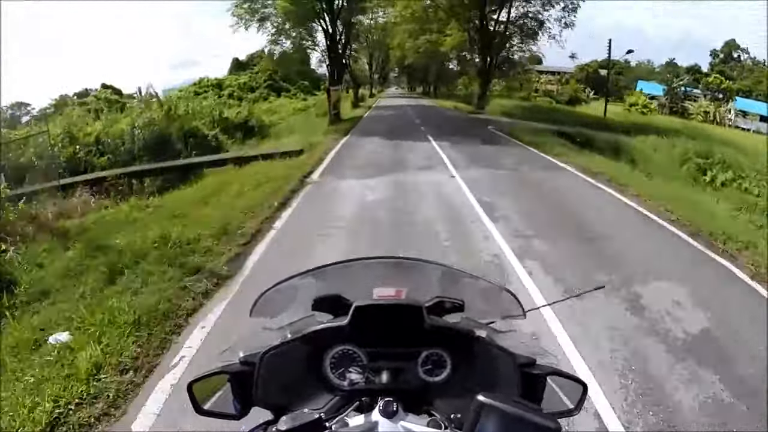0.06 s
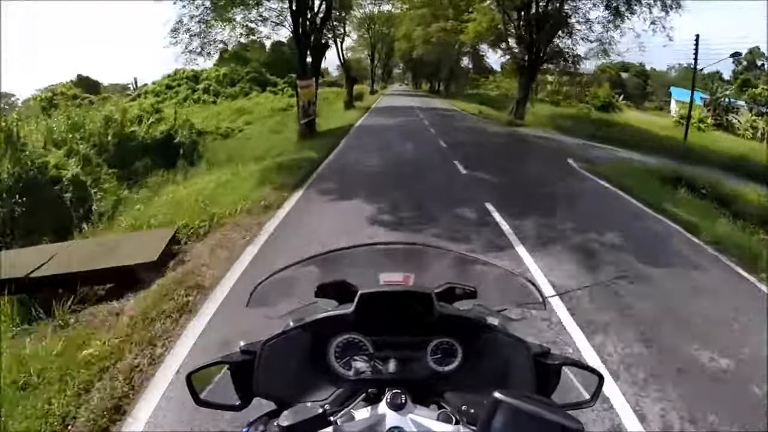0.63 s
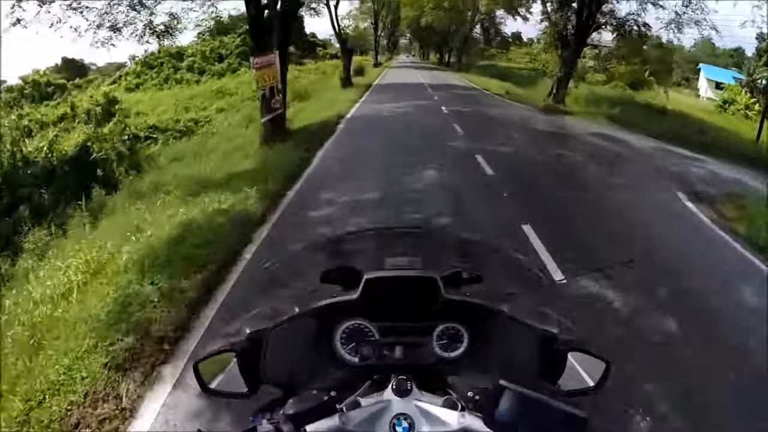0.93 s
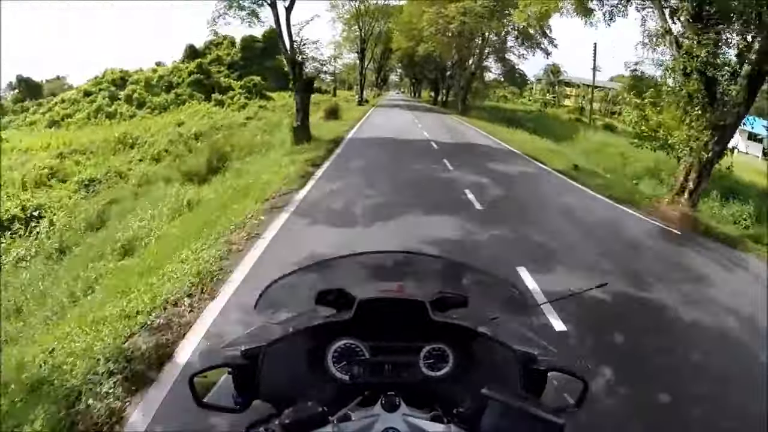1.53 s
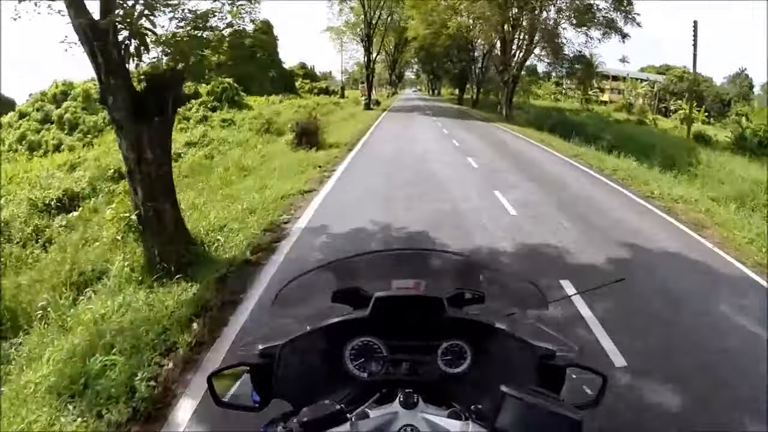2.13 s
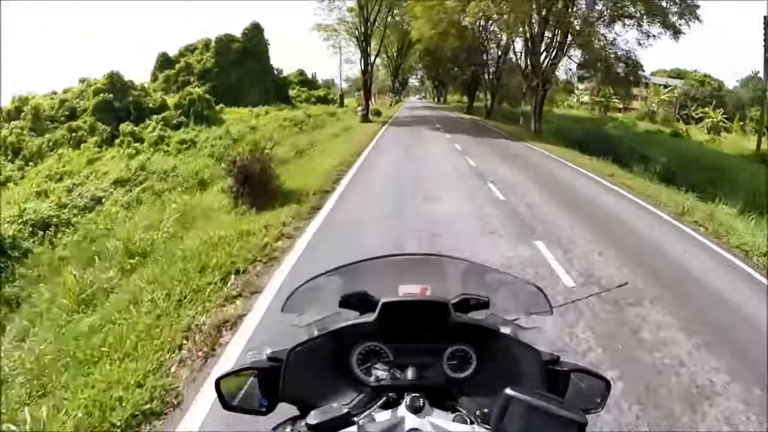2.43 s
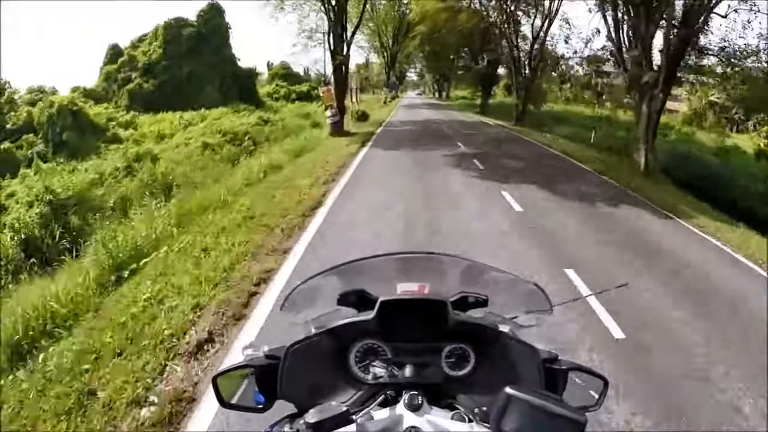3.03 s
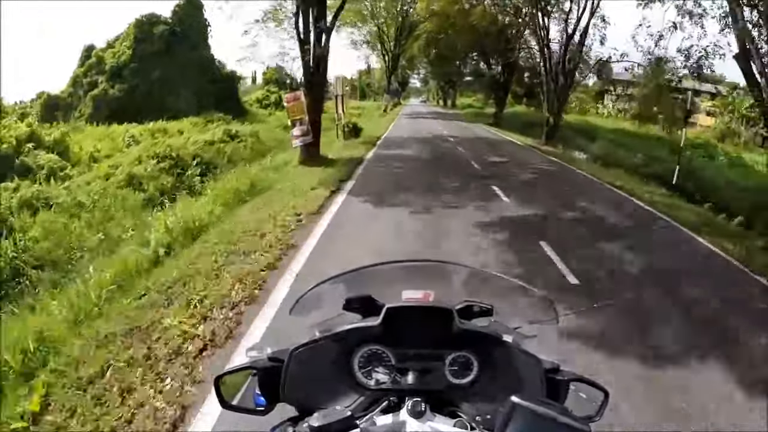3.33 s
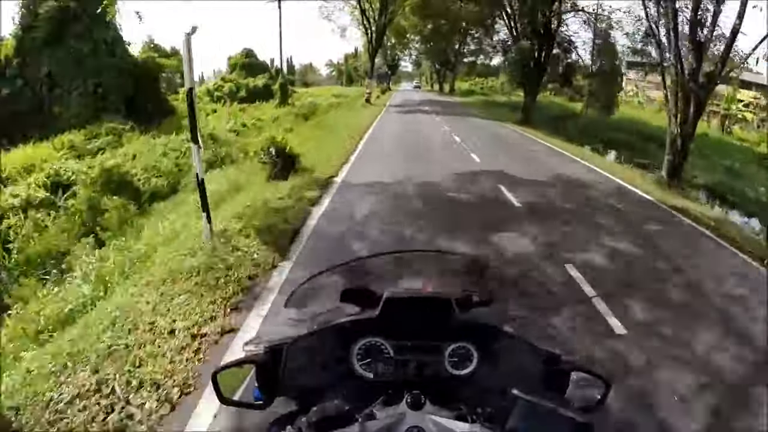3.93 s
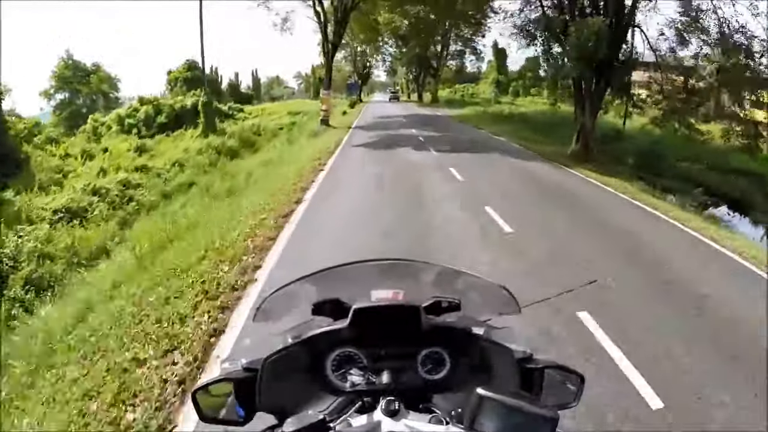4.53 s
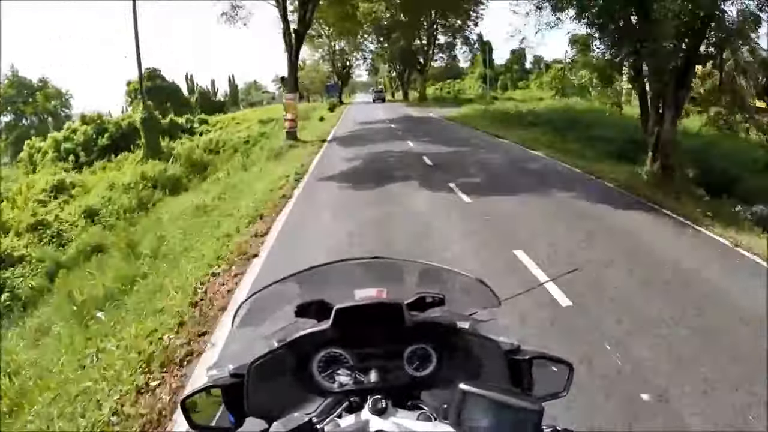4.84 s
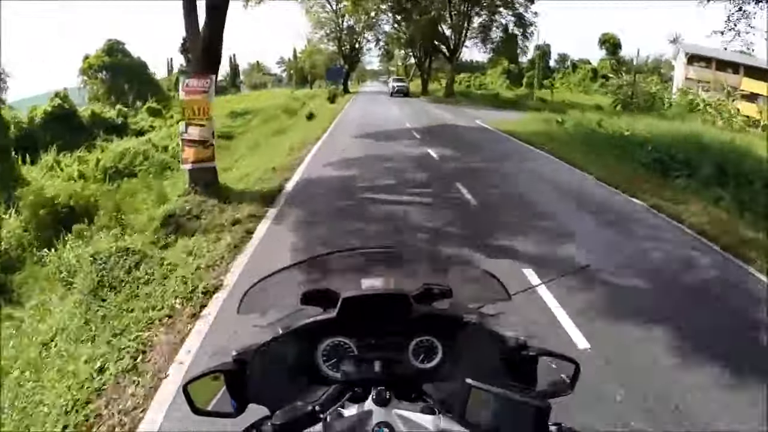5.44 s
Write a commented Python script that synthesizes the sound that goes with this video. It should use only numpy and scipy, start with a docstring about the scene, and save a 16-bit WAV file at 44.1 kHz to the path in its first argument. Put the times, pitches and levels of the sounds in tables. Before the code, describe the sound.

Close, heavy wind noise fills a helmet microphone on a moving motorcycle from start to finish. The air churns in a low rumble, topped by a flickering hiss, and keeps striking the microphone in uneven thumps. The hardest slaps come about a third and two thirds of the way through, each briefly squashing the rush. Otherwise the strength holds fairly even, with small swells and dips.

```python
"""Helmet wind on a country road

Wind on the helmet microphone of a cruising motorcycle. Eddies shed by the windscreen buffet the port
in thumps, and finer turbulence rumbles, roars and hisses round the shell. Now and then the low end
dips or a brief puff swells in the noise. The hardest slaps of air drive the camera's limiter, so that
the whole rush ducks and swells back."""
import sys
import numpy as np
from scipy import signal
from scipy.fft import rfft, irfft, next_fast_len
from scipy.io import wavfile
from scipy.ndimage import uniform_filter1d, minimum_filter1d

SR = 44100
rng = np.random.default_rng(int(sys.argv[2]) if len(sys.argv) > 2 else 0)


def store_wav(level_fs):
    """Save 16-bit WAV to argv[1]."""
    pcm = np.round(np.clip(np.atleast_2d(level_fs), -1, 1) * 32767)
    wavfile.write(sys.argv[1], SR, pcm.T.astype(np.int16))


N = 250047
TIME = np.arange(N) / SR


def from_db(db):
    """Decibels to gain."""
    return 10 ** (np.asarray(db) / 20)


def rms_one(x):
    """Scale to unit rms."""
    return x / np.sqrt(np.mean(x ** 2) + 1e-20)


def automation(points):
    """Straight ramps through (seconds, value) points."""
    return np.interp(TIME, *np.transpose(points))


def swell(centre_s, half_s):
    """A bell-shaped fade up to 1 and back."""
    return np.exp(-((TIME - centre_s) / half_s) ** 2 / 2)


def shaped_noise(gain_at):
    """Noise of unit rms, coloured by a gain as a function of frequency."""
    size = next_fast_len(N)
    hz = np.maximum(np.arange(size // 2 + 1) * SR / size, 1)
    white = rfft(rng.standard_normal(size))
    return rms_one(irfft(white * gain_at(hz), size)[:N])


def turbulence(colour):
    """Churning air: noise through an EQ curve of (Hz, dB) points, falling away beyond its ends."""
    points_hz, db = np.transpose(colour)

    def gain_at(hz):
        skirts = np.minimum(1, np.minimum(hz / points_hz[0], points_hz[-1] / hz)) ** 2
        return skirts * from_db(np.interp(np.log(hz), np.log(points_hz), db))
    return shaped_noise(gain_at)


def flutter(rate_hz, slowest_hz=9):
    """A random wobble of unit rms, mostly between the two rates."""
    return shaped_noise(lambda hz: hz / np.hypot(hz, slowest_hz) / (1 + (hz / rate_hz) ** 2))


def steadied(x, span_s, share):
    """Even out slow swells: a steady stream sheds eddies of similar strength."""
    size = int(span_s * SR)
    power = uniform_filter1d(uniform_filter1d(x ** 2, size), size)
    return rms_one(x / (power + 1e-9) ** (share / 2))


def buffet():
    """Big eddies off the windscreen rock the diaphragm."""
    # Sub-bass weight. Each row: frequency in Hz, relative level in dB.
    colour = [(14, -7), (25, -0.8), (35, -1.5), (46, 1), (60, -1), (78, 0.5), (98, -2), (125, -4.5),
              (150, -13.5), (220, -26)]
    return steadied(turbulence(colour), span_s=0.11, share=0.61)


def rumble(flurry, surge):
    """Mid-sized eddies roll past in flurries."""
    # Low body of the wind. Each row: frequency in Hz, relative level in dB.
    colour = [(90, -12), (150, 2.5), (200, 0.5), (260, -3), (330, -7), (400, -10.5), (500, -18.5),
              (800, -36)]
    body = steadied(turbulence(colour), span_s=0.06, share=0.85)
    return body * from_db(1.64 * flurry + 0.22 * surge)


def roar(flurry, surge):
    """Small eddies rush round the shell, with a flutter of their own."""
    # Midrange of the wind. Each row: frequency in Hz, relative level in dB.
    colour = [(250, -16.5), (400, 0.5), (480, 1), (630, -2), (800, -5.5), (1000, -10.5), (1300, -15.5),
              (2000, -24.5), (4000, -33)]
    rush = steadied(turbulence(colour), span_s=0.17, share=0.57)
    return rush * from_db(0.76 * flurry + 0.23 * surge + flutter(rate_hz=32))


def hiss(flurry, surge, crossover_hz=2900):
    """The finest turbulence flickers fast, while its treble slowly swells and eases."""
    # Airy top of the wind. Each row: frequency in Hz, relative level in dB.
    colour = [(600, -16), (1000, 2.5), (1500, 2.5), (2000, 0), (2700, -3), (3500, -7), (4200, -10.5),
              (5400, -11.5), (7000, -16.5), (9000, -21.5), (11000, -26), (13500, -35.5), (15500, -44)]
    # Treble ride above the crossover. Each row: time in seconds, gain in dB.
    treble = [(0, -1.5), (0.33, -1), (0.55, -1.7), (0.85, -1.5), (1.0, -1), (1.25, -0.5), (1.6, 0.2),
              (2.15, -0.7), (2.5, 0), (2.95, -0.9), (3.35, -1), (3.8, 0.2), (4.42, -1), (4.68, -1.5),
              (4.9, -2), (5.25, -0.6), (5.45, -1), (5.67, -4.5)]
    air = turbulence(colour)
    low = signal.sosfiltfilt(signal.butter(2, crossover_hz, fs=SR, output="sos"), air)
    air = low + from_db(automation(treble)) * (air - low)
    return air * from_db(0.78 * flurry + 0.24 * surge + 0.88 * flutter(rate_hz=260))


def wind(displaced):
    """Four sizes of turbulence ride the airflow; brief dips and slap cores duck the lowest two."""
    # Airflow over the helmet. Each row: time in seconds, strength in dB about the usual.
    flow = [(0, -0.5), (0.32, 0.8), (0.45, 0.2), (0.88, 0), (1.0, 1.5), (1.28, 2), (1.42, 0.6), (1.8, 0),
            (2.1, -1.3), (2.22, -1.8), (2.42, -0.5), (2.66, -0.3), (2.8, 0.5), (2.95, -1.2), (3.2, 1.9),
            (3.34, 0), (3.48, 1.6), (3.7, 0), (3.88, -0.7), (4.12, -0.3), (4.32, 0.5), (4.5, 0.7),
            (4.56, -1), (4.93, -0.5), (5.15, -0.1), (5.67, 1.6)]
    # Brief irregular dips in the low buffeting and rumble.
    # Each row: centre and half length in seconds, depth in the buffet in dB.
    dips = [(0.27, .03, 3), (0.62, 0.024, 4), (0.918, 0.0094, 2.5), (1.98, 0.039, 3), (2.367, 0.015, 6),
            (2.99, 0.018, 6), (3.49, .025, 4), (4.002, 0.012, 6), (4.773, 0.029, 3.5), (4.933, 0.013, 4),
            (5.26, 0.026, 4)]
    flow_db = automation(flow)
    dip_db = sum(depth_db * swell(centre_s, half_s) for centre_s, half_s, depth_db in dips)
    thinning_db = 0.36 * (TIME - TIME.mean())   # the rumble thins as the ride goes on
    buffet_gain = from_db(-14 + 0.48 * flow_db - dip_db) * (1 - displaced)
    rumble_gain = from_db(-20.5 + flow_db - thinning_db - 0.28 * dip_db) * (1 - 0.49 * displaced)
    eddies = buffet()
    # the finer layers flutter together and are strongest where the pressure swings furthest
    flurry = flutter(rate_hz=44)
    surge = np.abs(eddies) - np.mean(np.abs(eddies))
    return (buffet_gain * eddies
            + rumble_gain * rumble(flurry, surge)
            + from_db(-32 + flow_db) * roar(flurry, surge)
            + from_db(-38.5 + flow_db) * hiss(flurry, surge))


def puffs():
    """Brief, irregular puffs in the wind noise: each is one band of noise swelling and fading."""
    # Puffs and swells. Each row: peak time and half length in seconds,
    # band centre and width in Hz, level in dB.
    bursts = [(0.234, .015, 5500, 4000, -50), (0.33, .022, 4200, 3000, -45), (0.545, 0.02, 375, 170, -23.5),
              (0.663, 0.0071, 620, 600, -27), (0.745, 0.019, 560, 500, -28),
              (0.983, 0.026, 480, 450, -25.5), (0.987, 0.023, 75.4, 40, -24), (1.195, 0.067, 150, 140, -21),
              (1.298, 0.032, 352, 220, -21), (1.744, 0.011, 350, 250, -21.5), (2.071, .012, 560, 500, -29),
              (2.345, 0.017, 377, 250, -24), (2.76, 0.022, 4500, 4000, -47), (2.85, 0.034, 440, 350, -24.5),
              (3.179, 0.014, 745, 130, -26.5), (3.198, 0.036, 368, 280, -22),
              (3.538, .012, 5500, 3500, -47), (3.7, .014, 400, 500, -24), (3.944, 0.014, 450, 500, -29.5),
              (4.3, 0.06, 2610, 1400, -44.5), (4.325, .014, 840, 500, -37),
              (5.434, 0.0041, 1700, 1300, -30)]
    out = np.zeros(N)
    for peak_s, half_s, centre_hz, width_hz, level_db in bursts:
        band = shaped_noise(lambda hz: 1 / (1 + (2 * (hz - centre_hz) / width_hz) ** 2))
        out += from_db(level_db) * swell(peak_s, half_s) * band
    return out


def slaps():
    """A vortex pushes, then sucks. Returns the pressure and how far its core covers the port, 0-1."""
    # Large eddies hitting the port squarely. Each row: centre in seconds, peak in dB, swing in Hz.
    hits = [(0.359, -8, 53), (0.401, -6, 49.3), (0.972, -3.5, 50.3), (1.006, -7, 45), (1.065, -6.5, 87),
            (1.218, -6, 75), (1.256, -6, 66), (1.368, -8, 62), (1.628, -3, 76), (1.91, 5.5, 87),
            (2.169, -4.5, 128), (2.189, -5, 99), (2.627, -7.5, 63), (2.803, -3.5, 72), (3.295, -4.5, 74),
            (3.578, -6.5, 66), (3.835, 1.8, 71), (3.969, -5.5, 62), (4.528, -6.5, 55), (4.605, -6.5, 75),
            (4.889, -6, 66), (5.004, -4, 69.4), (5.596, -7, 67.5), (5.633, -6, 70.5)]
    pressure, core = np.zeros(N), np.zeros(N)
    for centre_s, peak_db, swing_hz in hits:
        turn = 2 * np.pi * swing_hz * (TIME - centre_s)
        pressure -= from_db(peak_db) * turn * np.exp((1 - turn ** 2) / 2)
        core = np.maximum(core, np.exp(-(turn / 2) ** 2 / 2))
    return pressure, core


def limiter(x, ceiling_db=-2.1, look_ahead_s=0.0012, hold_s=0.019, release_s=0.041):
    """The gain drops just ahead of any peak over the ceiling, holds and climbs back, fast at first."""
    hold, attack = int(hold_s * SR), int(2 * look_ahead_s * SR)
    excess_db = np.maximum(20 * np.log10(np.abs(x) + 1e-9) - ceiling_db, 1e-9)
    held_db = -minimum_filter1d(-excess_db, hold, origin=(hold - 1) // 2)
    # each duck dies away exponentially unless a deeper one takes over
    recovery = TIME / release_s
    duck_db = np.exp(np.maximum.accumulate(np.log(held_db) + recovery, axis=-1) - recovery)
    gain_db = uniform_filter1d(minimum_filter1d(-duck_db, attack), attack)
    return x * from_db(gain_db)


def scene():
    """All the moving air at one microphone; each slap whips up the wind round it."""
    pressure, core = slaps()
    stir = 1 + from_db(-13) * core
    return (stir * wind(displaced=core) + pressure + puffs())[None]


def record(dry, cutoff_hz=15100):
    """The camera limits the peaks and cuts the top."""
    high_cut = signal.ellip(10, 0.1, 80, cutoff_hz, fs=SR, output="sos")
    return signal.sosfilt(high_cut, limiter(dry))


dry = scene()
out = record(dry)
store_wav(out)
```